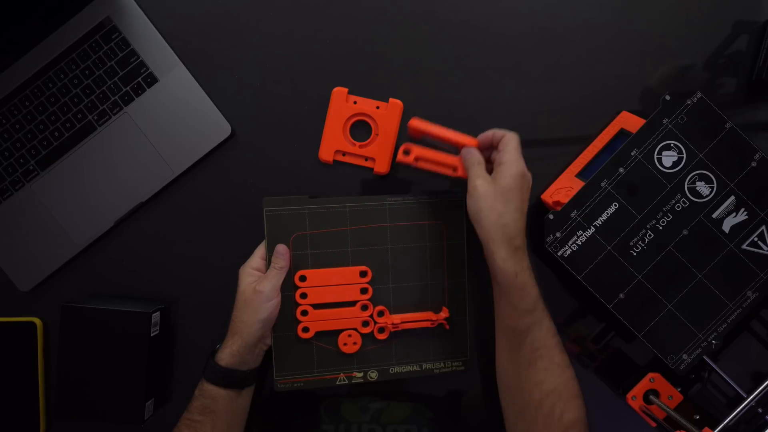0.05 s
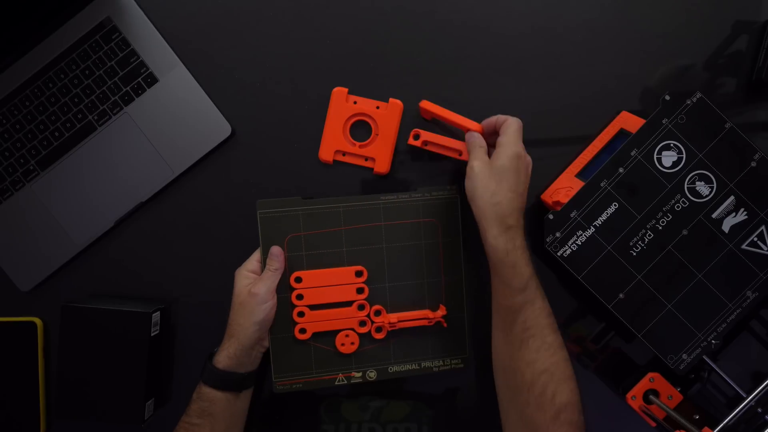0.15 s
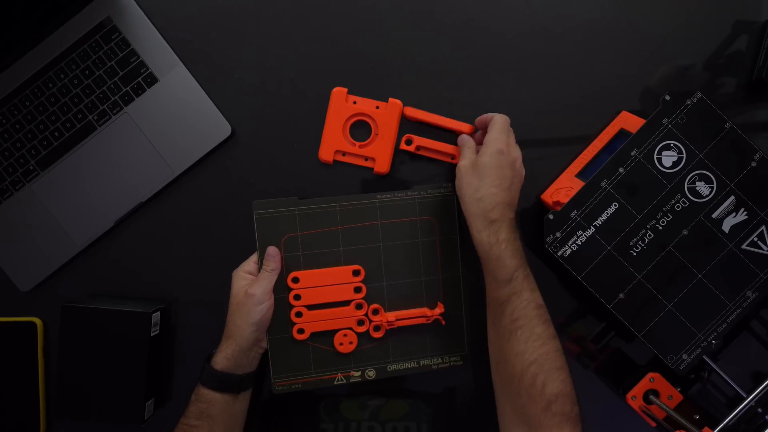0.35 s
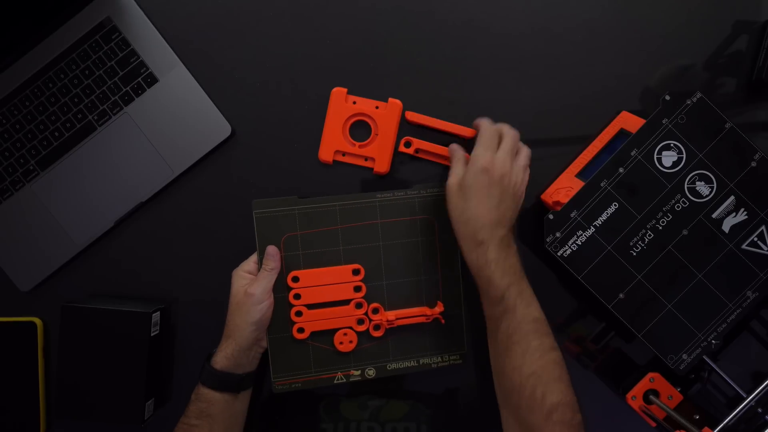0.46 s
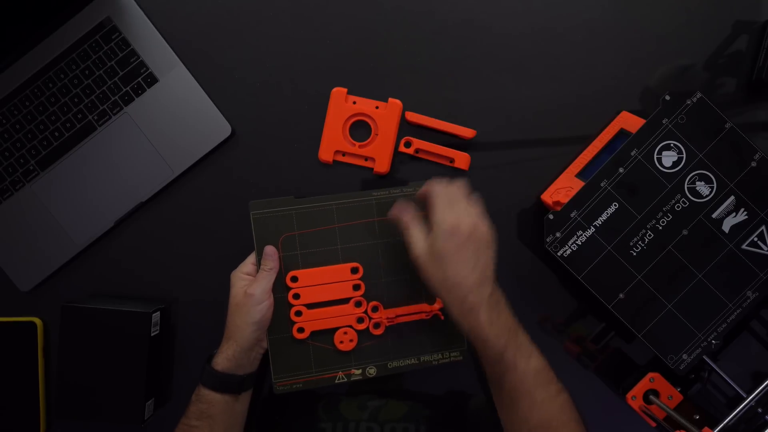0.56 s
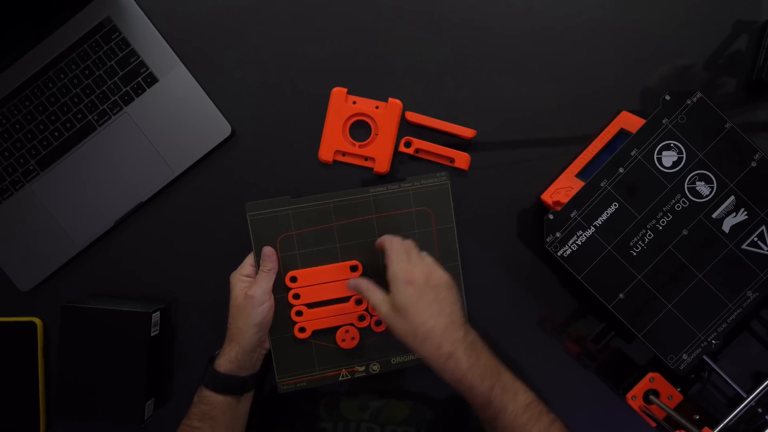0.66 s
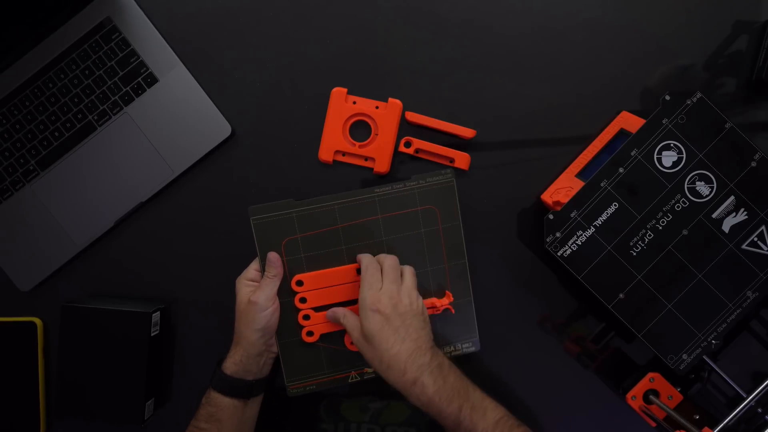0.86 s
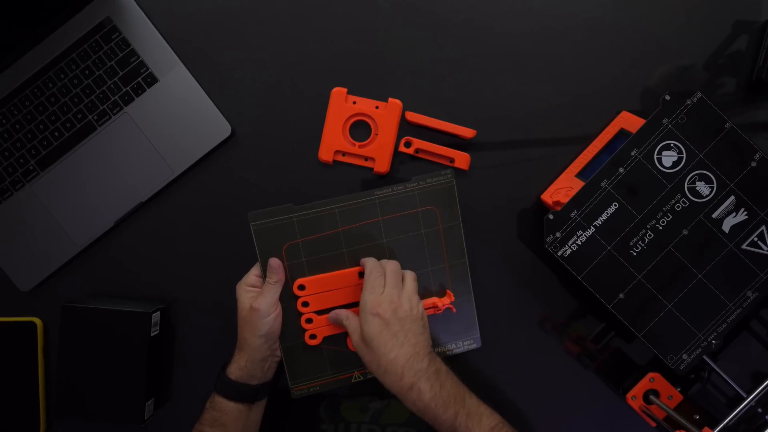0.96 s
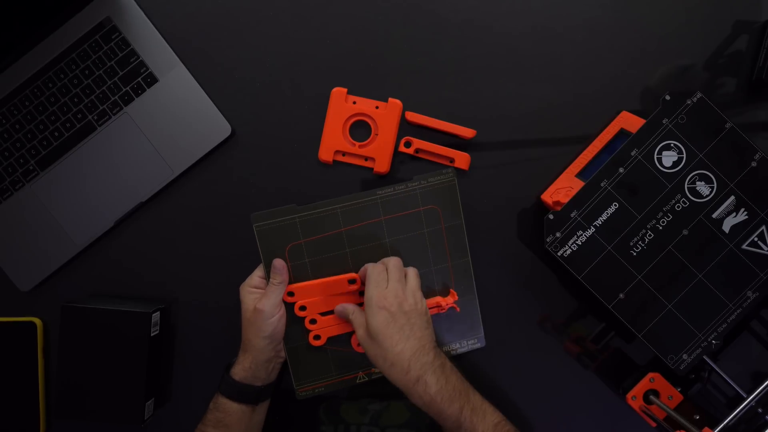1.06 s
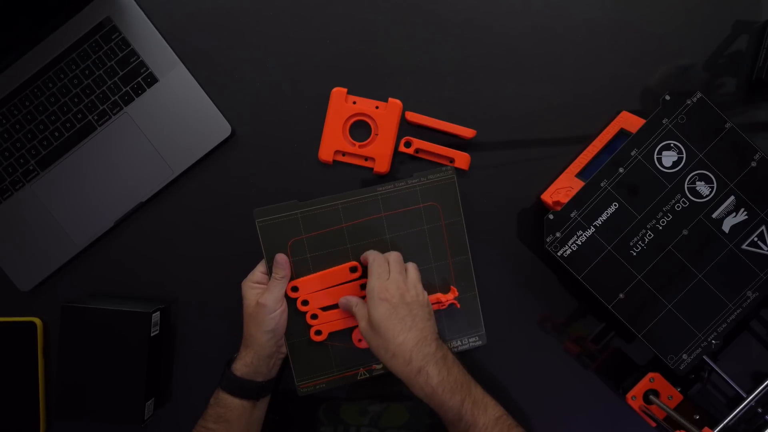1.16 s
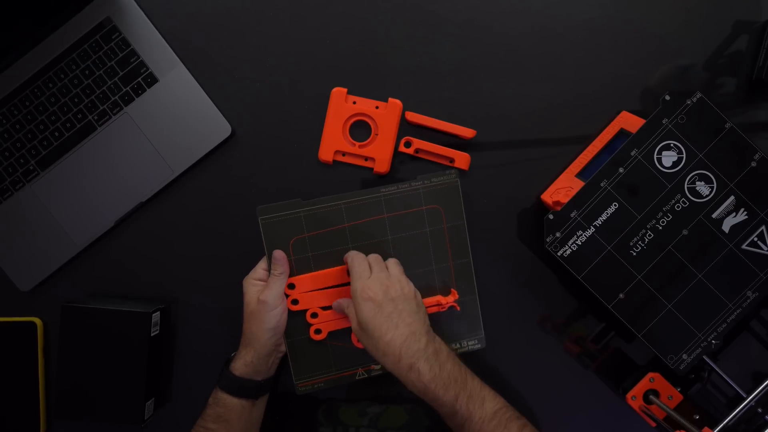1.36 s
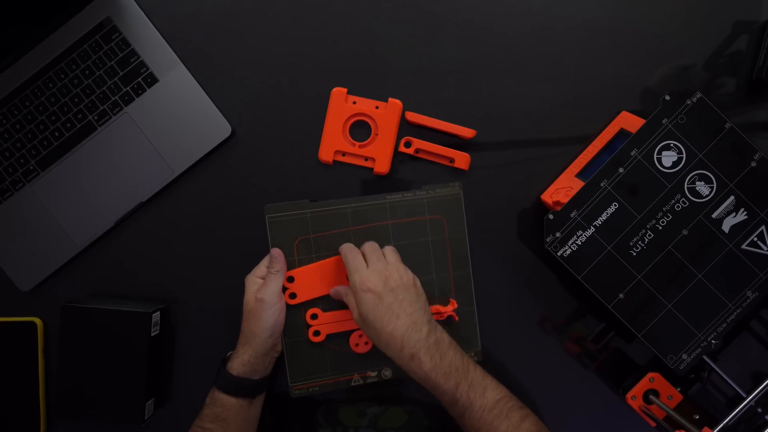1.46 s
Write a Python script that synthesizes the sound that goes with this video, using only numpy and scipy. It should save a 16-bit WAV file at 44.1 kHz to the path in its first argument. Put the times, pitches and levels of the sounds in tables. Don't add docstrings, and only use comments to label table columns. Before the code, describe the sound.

Plastic pieces drop and rattle on a desktop, followed by sharp cracks from a bent metal sheet

```python
import sys
import numpy as np
from scipy import signal
from scipy.fft import rfft, irfft, next_fast_len
from scipy.io import wavfile

SR = 44100
rng = np.random.default_rng(int(sys.argv[2]) if len(sys.argv) > 2 else 0)


def boost_factor(decibels):
    exponent = np.asarray(decibels, float) / 20
    return 10 ** exponent


def file_out(sig):
    cols = np.atleast_2d(sig).T
    lim = np.clip(cols, -1, 1)
    pcm = np.round(lim * 32767).astype(np.int16)
    wavfile.write(sys.argv[1], SR, pcm)


N = 66150

# frequency in Hz, level in dB, t60 in seconds.
DESK_MODES = [(273, -23, 0.22), (416.5, -21, 0.13), (534, -16.5, 0.068), (610, -2.5, 0.038),
              (711, 5, 0.025), (850, -12.5, 0.11), (1057, 9.5, 0.022), (1189, 2.5, 0.023),
              (1290, 4.5, 0.022), (1360, 2, 0.015), (1542, 1.5, 0.032), (2080, 0, 0.0044),
              (2636, -1, 0.0094), (3570, -13.5, 0.037)]
# frequency in Hz, level in dB, t60 in seconds.
SHEET_MODES = [(404, -25, 0.024), (562.5, -4.5, 0.082), (662, 1, 0.049), (768.4, 6.5, 0.045),
               (900, 5.5, 0.026), (1006, 2.5, 0.029), (1308, 0, 0.039), (1506, 2, 0.016), (1650, 0, 0.02),
               (1951, -10, 0.048), (2273, -16, 0.048), (2757, -26, 0.028), (4290, -39, 0.024)]


def unit(x):
    return x / np.sqrt(np.mean(x ** 2) + 1e-20)


def along(points, hz):
    f, v = np.transpose(points)
    return np.interp(np.log(hz + 1), np.log(f + 1), v)


def filtered(x, response):
    m = next_fast_len(len(x) + 8192)
    return irfft(rfft(x, m) * response(np.fft.rfftfreq(m, 1 / SR)), m)[:len(x)]


def highpass(x, corner_hz):
    return filtered(x, lambda f: (1j * f / (corner_hz + 1j * f)) ** 2)


def noise(spectrum, size):
    return unit(filtered(rng.standard_normal(size), lambda hz: boost_factor(along(spectrum, hz))))


def add(out, s, x, wet_db=-12):
    # frequency in Hz, t60 in seconds.
    room_decay = [(150, 0.83), (600, 0.26), (1800, 0.38), (4000, 0.37), (15000, 0.19)]
    gap_s = 0.006
    hz, t, z = signal.stft(rng.standard_normal(SR // 2), SR, nperseg=256)
    decay = boost_factor(-60 * t / along(room_decay, hz)[:, None])
    tail = signal.istft(z * decay, SR, nperseg=256)[1]
    wet = signal.fftconvolve(x, boost_factor(wet_db) * tail / np.linalg.norm(tail))
    for start, part in ((s, x), (s + gap_s, wet)):
        seat = out[round(start * SR):][:len(part)]
        seat += part[:len(seat)]


def onset(t, attack_s):
    return 1 - np.exp(-t / attack_s)


def struck_mode(t, db, hz, t60, attack_s):
    return boost_factor(db - 60 * t / t60) * np.sin(2 * np.pi * hz * t) * onset(t, attack_s)


def hits(rows, modes):
    # frequency in Hz, level in dB.
    crack_spectrum = [(800, -33), (2500, 11), (4000, 4), (5500, 1), (9000, 3.5), (13000, -4), (16000, -9)]
    scatter_db, detune, crack_t60 = 3.5, 0.032, 0.016
    out, t = np.zeros(N), np.arange(SR // 8) / SR
    hz, level_db, t60 = np.transpose(modes)[:, :, None]
    octaves = np.log2(np.maximum(hz / 700, 1))
    for s, db, crack_db, tilt_db, share in rows:
        level_draw, pitch_draw = rng.standard_normal((2, len(modes), 1))
        mode_db = level_db + tilt_db * octaves + scatter_db * level_draw
        decay = boost_factor(mode_db - 60 * t / (t60 * share))
        tones = decay * np.sin(2 * np.pi * hz * (1 + detune * pitch_draw) * t)
        ring = tones.sum(0) * onset(t, 0.0017)
        crack = boost_factor(crack_db - 60 * t / crack_t60) * noise(crack_spectrum, len(t)) * onset(t, 0.0003)
        add(out, s, -boost_factor(db) * (ring / np.abs(ring).max() + crack))
    return out


def resonances(modes, damping, tilt_db):
    def response(f):
        total = 0
        for k, (center, db, t60) in enumerate(modes):
            gain = (-1) ** k * boost_factor(db + tilt_db * np.log2(center / 800))
            loss = 1j * f * damping / t60
            total = total + gain * loss / (center * center - f * f + loss)
        return total
    return response


def slips(rate, spread_db, size):
    happens = rng.random(size) < rate / SR
    size_db = spread_db * np.minimum(rng.exponential(size=size), 3)
    return happens * rng.standard_normal(size) * boost_factor(size_db)


def room_floor():
    # frequency in Hz, level in dB per Hz.
    floor_spectrum = [(25, -7), (60, 1.5), (150, -8.5), (300, -8), (600, -15), (1400, -23.5), (4000, -30.5),
                      (16000, -33)]
    return boost_factor(-58) * noise(floor_spectrum, N)


def thuds():
    # start in seconds, level in dB.
    thud_rows = [
        (0.201, -25),
        (0.295, -39),
        (0.432, -35),
        (0.443, -31),
        (0.745, -41),
        (0.806, -38.5),
        (0.997, -35.5),
        (1.206, -44),
    ]
    out, t = np.zeros(N), np.arange(SR // 5) / SR
    for s, db in thud_rows:
        add(out, s, struck_mode(t, db, 114.7, 0.071, 0.0014))
    return out


def drops():
    # start in seconds, peak in dB, crack over knock in dB, brightness in dB per octave,
    # share of the full ring time.
    drop_rows = [(.2030, -6.5, -23.5, -6, 0.7), (.2255, -17, -23, -5, 0.79),
                 (.236, -19.5, -27.5, -4.5, 0.85), (.2728, -16.5, -9, -12, 0.5),
                 (.2965, -23, -8.5, -19.5, 0.87), (.3045, -33, -8, -12.5, .6),
                 (.316, -33.5, -18, -19, 0.25), (.399, -38, -33, -11, 1), (.4305, -4.5, -4.5, 6, 0.27),
                 (.4428, -10.5, -1, 0.5, 0.55), (.4465, -13, -8, -9, 1), (.4793, -12.5, -6, -12, 0.46),
                 (.4875, -18, -1.5, -4, 0.97), (.5075, -18, -11, -3.5, 0.79), (.5210, -23.5, -21, 3, 0.2),
                 (.5275, -21, -16.5, -8, 1), (.549, -25.5, -15.5, -12, 0.84)]
    return hits(drop_rows, DESK_MODES)


def ticks():
    # start in seconds, level in dB, pitch in Hz, t60 in seconds.
    tick_rows = [(.2036, -24, 3300, 0.0067), (.2257, -38, 3180, .01), (.2735, -17, 3750, 0.0062),
                 (0.2724, -25, 7830, 0.0039), (0.2956, -39, 3470, 0.013), (0.304, -43, 2970, .01),
                 (.43066, -1, 3600, .011), (.4305, -10, 7540, .004), (.4305, -8, 11600, .005),
                 (0.44, -20, 7100, .005), (0.442, -33, 6700, .005), (0.4434, -8, 10800, 0.0036),
                 (.4428, -10, 8200, 0.0053), (0.4445, -7, 12400, 0.0042), (.4442, -0.5, 3970, 0.0029),
                 (0.457, -16, 6900, .005), (.4876, -11.5, 3880, 0.005), (.4876, -19, 9400, 0.0046),
                 (1.036, -20, 13000, .004), (1.0389, -5, 9600, 0.003), (1.039, -13.5, 8000, 0.0042),
                 (1.0415, -21, 6440, 0.0043), (1.0422, -20, 3040, 0.0059), (1.0438, -16, 12900, .005),
                 (1.045, -13, 6940, 0.0051), (1.0487, -25, 6100, .004), (1.047, -17, 3730, 0.0063),
                 (1.0520, -17.5, 3600, 0.0043), (1.055, -19, 13140, .005), (1.0556, -23, 7460, 0.0041),
                 (1.0593, -18, 12400, .005), (1.107, -40, 5870, .005), (1.1138, -33, 4110, 0.01),
                 (1.117, -38, 5400, .005), (1.1157, -31.5, 2700, 0.015), (1.2042, -20, 12900, 0.0025),
                 (1.2054, -8.5, 6140, 0.0043), (1.2075, -8, 12100, 0.0041), (1.2093, -17, 6950, 0.0033),
                 (1.2130, -21, 6750, 0.0059), (1.216, -31, 7000, 0.0067), (1.2187, -31, 3140, 0.0059)]
    out, t = np.zeros(N), np.arange(SR // 50) / SR
    for s, db, hz, t60 in tick_rows:
        add(out, s, -struck_mode(t, db, hz, t60, 0.00029), wet_db=-16)
    return out


def chatter():
    # start in seconds, length in seconds, level in dB.
    chatter_rows = [
        (0.205, 0.029, -33),
        (0.28, 0.054, -35.5),
        (.433, 0.096, -23.5),
    ]
    out, t = np.zeros(N), np.arange(SR // 5) / SR
    for s, length, db in chatter_rows:
        rattle = unit(filtered(slips(1200, 0.83, len(t)), resonances(DESK_MODES, 4.46, tilt_db=2.5)))
        add(out, s, rattle * boost_factor(db - 16.5 * (t / length) ** 2))
    return out


def peels():
    # start in seconds, swell in seconds, level in dB, pitch in Hz, fade in seconds.
    peel_rows = [(0.2736, 0.00083, -39.5, 3630, 0.0016), (0.277, .004, -52, 5540, 0.029),
                 (0.4288, 0.0018, -22.5, 6940, 0.00087), (0.435, .003, -41, 8400, 0.0093),
                 (0.4501, 0.0027, -24.5, 12000, 0.0079), (0.869, 0.0173, -65.5, 11420, 0.011),
                 (0.996, 0.0009, -38.5, 11340, 0.001), (1.017, 0.0016, -36.5, 11830, 0.0019),
                 (1.0308, 0.0010, -30, 12000, 0.0015), (1.0351, 0.0027, -22, 13500, 0.0029),
                 (1.040, 0.0046, -16, 12900, 0.0022), (1.037, 0.0044, -29, 5370, 0.0064),
                 (1.050, 0.0032, -26, 13500, 0.0057), (1.107, 0.0085, -43, 4500, 0.0085),
                 (1.2056, .0004, -16.5, 11100, .0015), (1.2051, 0.0019, -20.5, 6740, 0.0014),
                 (1.212, 0.0048, -44, 7240, 0.0097), (1.314, 0.0014, -49, 12300, 0.0016)]
    out, t = np.zeros(N), np.arange(SR // 12) / SR
    for s, length, db, hz, fade in peel_rows:
        spike_db = 3 * np.minimum(rng.exponential(size=len(t)), 3)
        spiky = rng.standard_normal(len(t)) * boost_factor(spike_db)
        spray = unit(filtered(spiky, lambda f: 0.18 * f / (f + 3000) + 1 / (1 + ((f / hz - 1) / 0.2) ** 4)))
        swell = 0.45 + 0.55 * t / length
        add(out, s, boost_factor(db) * spray * np.where(t < length, swell, np.exp((length - t) / fade)))
    return out


def rub():
    # time in seconds, level in dB, hiss relative to it in dB.
    rub_path = [(0.721, -68.5, -18), (.76, -64.5, -9), (0.881, -54.5, -17), (.94, -68, -28),
                (1.001, -54, -23), (1.14, -51, -50), (1.27, -74, -30), (1.327, -44, -40), (1.4, -51, -30),
                (1.435, -55.5, -16), (1.457, -41, -13), (1.5, -49, -6.5)]
    # frequency in Hz, level in dB.
    hiss_spectrum = [(1500, -25), (4000, -13.5), (8000, -13.5), (13000, -10.5), (16000, -12)]
    s, db, hiss_db = np.transpose(rub_path)
    t = np.arange(N) / SR
    body = unit(filtered(slips(3000, 1.2, N), resonances(SHEET_MODES, 7.9, tilt_db=-0.5)))
    hiss = boost_factor(np.interp(t, s, hiss_db)) * noise(hiss_spectrum, N)
    return boost_factor(np.interp(t, s, db, left=-120)) * (body + hiss)


def hums():
    # start in seconds, level in dB, pitch in Hz, t60 in seconds.
    hum_rows = [(.7275, -37, 780, 0.023), (.7455, -15.5, 719, 0.02), (.966, -33, 763, 0.021),
                (1.0407, -10.5, 1383, 0.03), (1.046, -18, 673.5, 0.061), (1.1045, -19.5, 1650, 0.023),
                (1.108, -11.5, 1380, 0.017), (1.1140, -13, 672, 0.026), (1.1538, -22, 717, 0.029),
                (1.1612, -13.5, 757, 0.022), (1.1716, -12.5, 779, 0.045), (1.2055, -19, 684, 0.042),
                (1.316, -30, 1830, 0.029)]
    out, t = np.zeros(N), np.arange(SR // 8) / SR
    for s, db, hz, t60 in hum_rows:
        add(out, s, -struck_mode(t, db, hz, t60, 0.00099))
    return out


def knocks():
    # start in seconds, peak in dB, crack over knock in dB, brightness in dB per octave,
    # share of the full ring time.
    knock_rows = [(.7430, -23.5, -23, -7, 0.26), (.7460, -26, -15.5, 1, 0.5), (.784, -40.5, -14, -7, 0.52),
                  (.8038, -21.5, -20.5, -4.5, 0.4), (.9965, -23, -9, -1, 1), (1.0365, -19.5, -5, 17, 0.63),
                  (1.0430, -11.5, -8.5, 11, 0.44), (1.0605, -15, -22, 1.5, 0.43), (1.1050, -19, -16, 12, 1),
                  (1.114, -20, -28, -3, 1), (1.1175, -17.5, -15, 11, 0.29), (1.1715, -20, -16, 7, 0.33),
                  (1.1935, -17, -14.5, 5, 0.34), (1.2053, -13, -14.5, 3, 0.43),
                  (1.2246, -24, -23.5, 9, 0.25), (1.316, -31, -16, 7, 0.68), (1.447, -33.5, -23, 9.5, 0.83),
                  (1.4555, -32, -26, -8, 0.85)]
    return hits(knock_rows, SHEET_MODES)


def squeaks():
    # middle in seconds, length in seconds, level in dB, pitch in Hz.
    squeak_rows = [(1.316, 0.012, -54.5, 3020), (1.336, 0.027, -41, 775), (1.352, .03, -62, 2800),
                   (1.357, 0.032, -46.5, 1767), (1.361, 0.011, -63, 5810), (1.392, 0.031, -52, 1870),
                   (1.451, 0.011, -53, 3980), (1.477, .02, -44, 1413), (1.482, 0.023, -57, 4300),
                   (1.494, .022, -58, 2960), (1.498, 0.026, -43.5, 1510), (.9, .06, -51, 575),
                   (1.111, .014, -24.5, 633), (1.459, 0.027, -40.5, 871), (1.209, 0.013, -21.5, 1068)]
    out = np.zeros(N)
    for s, length, db, hz in squeak_rows:
        t = np.arange(round(length * SR)) / SR
        swell = np.sin(np.pi * t / length) ** 2
        add(out, s - length / 2, boost_factor(db) * swell * np.sin(2 * np.pi * hz * t))
    return out


def scene():
    desk = thuds() + drops() + chatter()
    sheet = highpass(rub() + hums() + knocks(), 220)
    close = desk + sheet + ticks() + peels() + squeaks()
    return (highpass(close, 90) + room_floor())[None]


def low_pass(x):
    return signal.sosfilt(signal.butter(12, 16820, fs=SR, output="sos"), x)


def record(dry):
    rounded = dry[0] / (1 + np.abs(dry[0]) ** 10) ** 0.112
    mix = filtered(rounded, lambda hz: (1j * hz / (45.6 + 1j * hz)) / (1 + (hz / 16000) ** 60))
    return low_pass(mix[None])


dry = scene()
out = record(dry)
file_out(out)
```